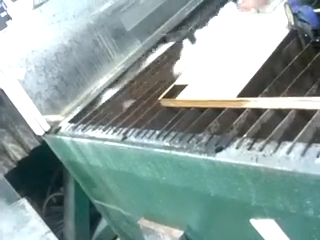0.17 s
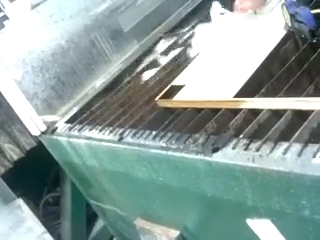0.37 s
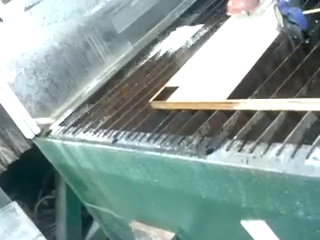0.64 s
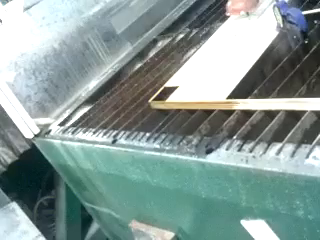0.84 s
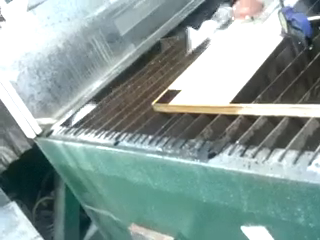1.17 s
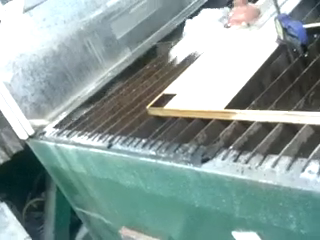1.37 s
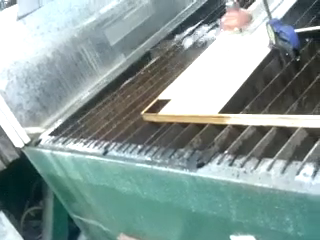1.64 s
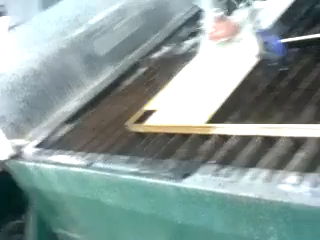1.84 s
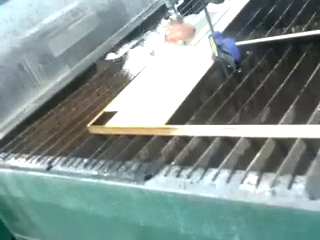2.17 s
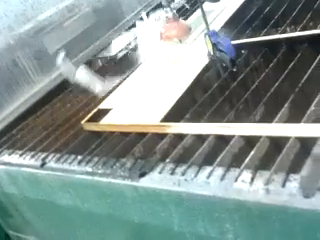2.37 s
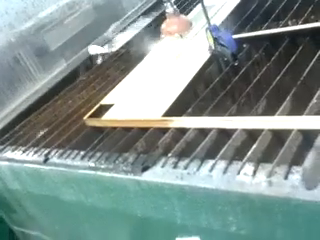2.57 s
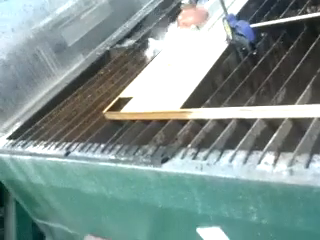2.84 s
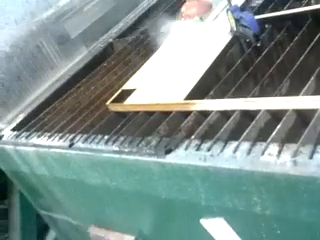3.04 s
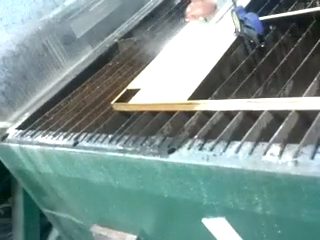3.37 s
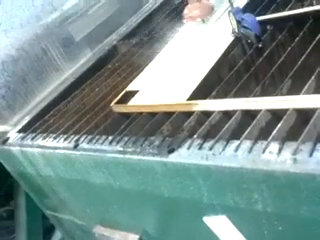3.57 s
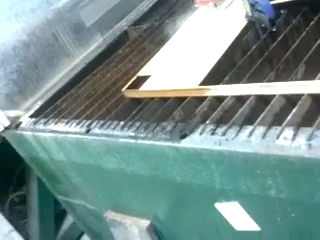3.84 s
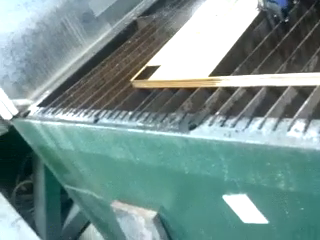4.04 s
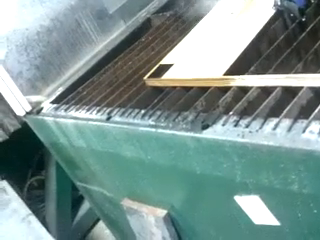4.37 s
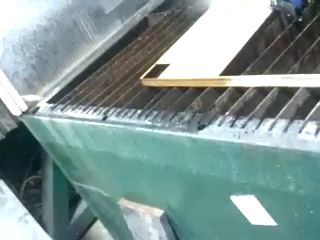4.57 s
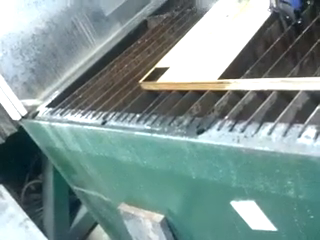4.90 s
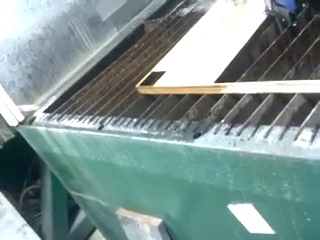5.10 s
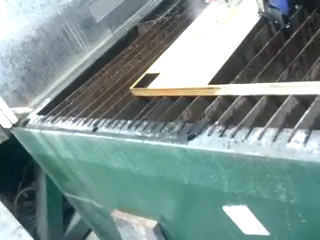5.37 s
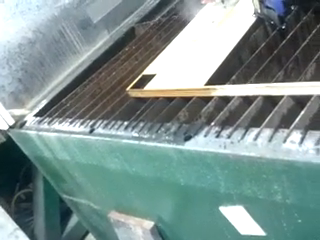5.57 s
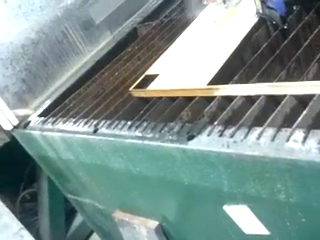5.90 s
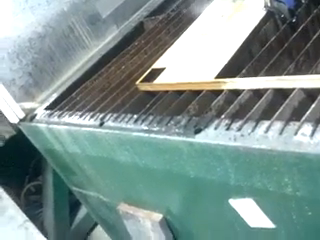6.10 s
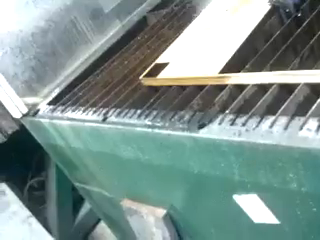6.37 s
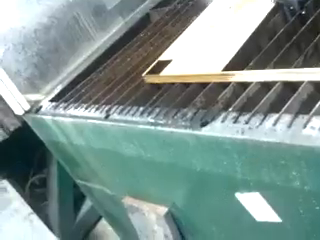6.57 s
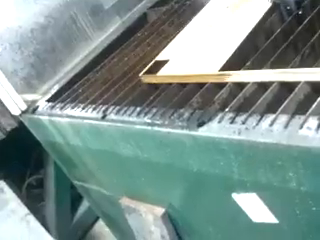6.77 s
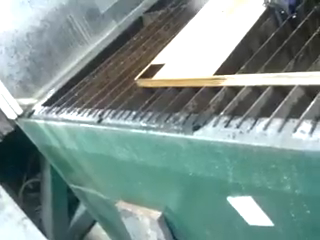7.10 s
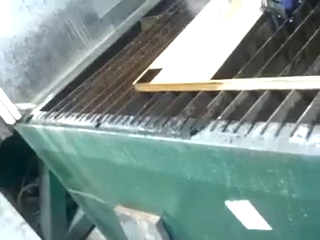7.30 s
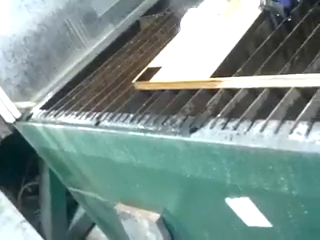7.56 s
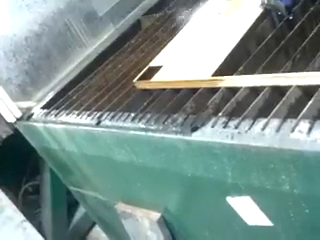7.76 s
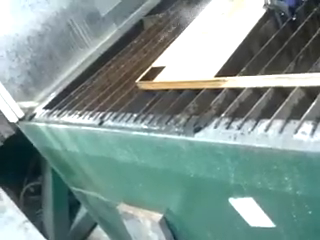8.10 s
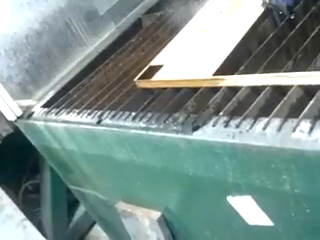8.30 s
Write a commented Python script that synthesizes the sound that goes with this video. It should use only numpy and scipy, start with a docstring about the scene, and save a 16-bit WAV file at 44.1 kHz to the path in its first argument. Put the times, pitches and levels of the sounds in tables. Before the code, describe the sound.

A waterjet cutter hisses and sprays steadily close by, water churning in its tank over a whining pump and low machine hum.

```python
"""In a workshop, a waterjet cuts a slab over a steel catch tank, close to a small stereo camera.
Behind it a pump, a second motor and a faint low drone hum as multiples of slightly unsteady rotations.
The tank booms, churns, splashes and patters: coloured patchy noise, with random drops in the last two.
The jet hisses and sprays as brighter noise with drops, and slot and nozzle ring as narrow bands of noise.
Once a sharp tick sounds at the left port and the level dips briefly."""
import sys
import numpy as np
from scipy import signal
from scipy.fft import rfft, irfft, next_fast_len
from scipy.io import wavfile
from scipy.ndimage import uniform_filter1d, map_coordinates

SR = 44100
rng = np.random.default_rng(int(sys.argv[2]) if len(sys.argv) > 2 else 0)


def unload_wav(signal):
    """Save mono or channel-first audio to the path in sys.argv[1] as 16-bit WAV at rate SR, clipped to [-1, 1]."""
    wavfile.write(
        sys.argv[1],
        SR,
        np.round(np.clip(np.atleast_2d(signal).T, -1, 1) * 32767).astype(np.int16),
    )


N = 372204
T = np.arange(N) / SR  # time of each sample [s]


def amp(db):
    """Turn decibels into a gain."""
    return 10 ** (np.asarray(db) / 20)


def unit(x):
    """Scale to an rms of 1."""
    return x / np.sqrt(np.mean(x ** 2) + 1e-20)


def along(points, hz):
    """Read (frequency [Hz], value) points along a logarithmic frequency axis."""
    point_hz, values = np.transpose(points)
    return np.interp(np.log(hz + 1), np.log(point_hz + 1), values)


def curve(rows):
    """Read (time [s], level [dB]) rows at every sample."""
    times, levels = np.transpose(rows)
    return np.interp(T, times, levels)


def swells(rows):
    """Bell-shaped swells from (time, length at half height, dB, ...) rows: one curve for each dB column."""
    times, lengths, *db_columns = np.transpose(rows)
    bells = 0.5 ** ((2 * (T - times[:, None]) / lengths[:, None]) ** 2)
    return np.array(db_columns) @ bells


def wobble(rate):
    """A smooth random curve through rate random knots a second."""
    knots = rng.standard_normal(int(N * rate / SR) + 4)
    return map_coordinates(knots, [T * rate])


def filtered(x, response):
    """Shape the spectrum of x by a response of frequency."""
    size = next_fast_len(N + SR // 2)
    spectrum = rfft(x, size) * response(np.fft.rfftfreq(size, 1 / SR))
    return irfft(spectrum, size)[..., :N]


def turbulence(patchy_db):
    """Turbulent water: two white noises whose strength drifts in shared patches of time and pitch."""
    cells = signal.stft(rng.standard_normal((2, N)), nperseg=512)[2]
    patches = uniform_filter1d(rng.standard_normal(cells.shape[1:]), size=6, axis=0)  # across pitch
    patches = uniform_filter1d(patches, size=16, axis=1)  # across time
    noise = signal.istft(cells * amp(patchy_db * unit(patches)), nperseg=512)[1]
    return unit(noise[:, :N])


def drops(rate):
    """Drops landing: tiny impacts of random size at random moments, about rate a second in each channel."""
    return unit((rng.random(N) < rate / SR) * rng.standard_normal((2, N)))


# How unlike the two microphone ports hear the water: (frequency [Hz], side over mid [dB])
PORT_WIDTH = [(50, -6), (110, 10), (170, 1), (270, -10.5), (450, -4), (750, -8.5), (1050, -26), (1700, 13),
              (2400, 1.5), (9500, 0)]


def at_ports(pair, spectrum):
    """Colour a mid and side pair and spread it over the left and right ports."""
    def response(hz):
        side_gain = amp(along(PORT_WIDTH, hz))
        return amp(along(spectrum, hz)) * np.array([np.ones_like(hz), side_gain])
    mid, side = filtered(pair, response)
    return np.array([mid + side, mid - side]) / np.std(mid)


def hum(hz, tones, drift, waver_db):
    """Multiples of one slightly unsteady rotation; each tone wavers on its own at each port."""
    turn = 2 * np.pi * hz * np.cumsum(1 + drift * wobble(5)) / SR
    ports = np.array([[.5], [-.5]])  # left, right
    out = np.zeros((2, N))
    for multiple, db, lean_db, lead in tones:
        waver = waver_db * np.array([wobble(2.84), wobble(2.89)])
        gain = amp(db + ports * lean_db + waver)
        out += gain * np.sin(round(multiple) * turn + ports * lead)
    return np.sqrt(2) * out  # a 0 dB tone has an rms of about 1


# The low drone as it stands in the room:
# (multiple of rotation, relative level [dB], left over right [dB], left lead [rad])
DRONE_TONES = [(1, 0, 3.7, 3.25)]
DRONE_HZ, DRONE_DB = 111.2, -50


def drone():
    """A faint low tone far beneath the machines."""
    return amp(DRONE_DB) * hum(DRONE_HZ, DRONE_TONES, drift=0.0011, waver_db=3.0)


# The second motor's tones as they stand in the room:
# (multiple of rotation, relative level [dB], left over right [dB], left lead [rad])
MOTOR_TONES = [(1, -3, -8.5, 0.21), (2, 0.16, -10, 1), (4, -15, -5, 0)]
MOTOR_HZ, MOTOR_DB = 387.68, -36.5


def motor():
    """A second motor at one overall setting; only its separate tones waver."""
    return amp(MOTOR_DB) * hum(MOTOR_HZ, MOTOR_TONES, drift=0.00066, waver_db=3.0)


# The pump's tones as they stand in the room:
# (multiple of rotation, relative level [dB], left over right [dB], left lead [rad])
PUMP_TONES = [(1, -15, -3, -.5), (2, 0.5, -3, .2), (3, -15, -7, -.6), (4, -20, -3, -.4), (6, -23, 0, 0),
              (7, -26, 0, 0), (9, -23.5, -1, -.7), (10, -19, -3, -1.7), (12, -26, 0, -3)]
# The pump's whine where the camera stands, before its random waver: (time [s], level [dB])
PUMP_LEVEL = [(0, -30), (1.8, -29.5), (2.4, -27.5), (3.6, -27.5), (4.1, -29.5), (5.7, -29), (6.1, -30.5),
              (7.1, -26.5), (8.44, -27.5)]
PUMP_HZ = 208.68
PUMP_SWING_DB, PUMP_SWINGS_PER_S = .7, 6


def pump():
    """The pump's rotation whines in many multiples, its level wavering a little at random."""
    level_db = curve(PUMP_LEVEL) + PUMP_SWING_DB * wobble(PUMP_SWINGS_PER_S)
    return amp(level_db) * hum(PUMP_HZ, PUMP_TONES, drift=0.0012, waver_db=.8)


# How hard the tank water is stirred: (time [s], churning level [dB])
TANK_STIR = [(0, -31.5), (1.5, -33.5), (2.15, -30.5), (3.3, -32.5), (4.1, -29), (5.0, -29.5), (5.9, -28),
             (6.5, -30.5), (7.15, -30), (7.8, -30.5), (8.44, -30)]
# Gulps where the jet throws up more water:
# (time [s], length at half height [s], extra churning [dB], extra splashing [dB])
GULPS = [(1.92, 0.087, 3, 4), (2.16, 0.054, 9, 1), (2.77, .09, 6, 3.5), (2.875, .045, 5, 7),
         (3.81, 0.078, 7.5, 1), (4.21, 0.043, 0.5, 2.5), (4.68, 0.064, 0, 7), (4.79, 0.041, 1, 6),
         (4.93, 0.13, 1.5, 4), (5.09, 0.061, 0, 5), (5.27, 0.041, 1.5, 1), (5.58, .06, 2.5, 6.5),
         (5.83, 0.086, 3, 3), (6.97, 0.041, 2.5, -1), (7.21, 0.046, 5, 2), (8.22, .04, 6, 0)]
# Deep heaves of the tank water: (time [s], length at half height [s], extra boom [dB])
HEAVES = [(1.5, 0.041, 6), (2.75, .05, 6), (2.85, 0.07, 14.5), (3.43, 0.078, 11.5), (4.68, .07, 7.5),
          (4.87, .06, 6.5), (5.0, 0.11, 8), (7.68, 0.087, 5)]
# Spectral shapes of the tank's boom, churning, splashing and fine patter:
# (frequency [Hz], relative level per Hz [dB])
BOOM_SPECTRUM = [(25, -56), (55, -28), (90, -20.5), (135, -9), (175, 2), (200, 2), (260, -15), (700, -88)]
CHURN_SPECTRUM = [(50, -88), (150, -25), (200, -7.5), (235, -2), (275, 3.5), (360, 0), (405, 4.5),
                  (470, -6.5), (700, -36), (2000, -90)]
SPLASH_SPECTRUM = [(60, -90), (330, -8), (460, 0), (550, -1.5), (640, -.5), (800, -2), (950, -5),
                   (1100, -4), (1300, -5.5), (1500, -11), (1900, -22), (4000, -90)]
PATTER_SPECTRUM = [(600, -60), (1400, -5), (1600, -1.5), (1850, -1), (2050, -1.5), (2200, -5), (2400, -14),
                   (3000, -35), (6000, -90)]
SLOSH_PER_S, SLOSH_DB = 15, 1.07  # the water sloshes at random
# the deep boom eases off as the cut advances
BOOM_DB, BOOM_FADE_DB_PER_S, BOOM_SWING_DB = -41, 0.5, 2.5
SPLASH_DB, SPLASH_FOLLOWS = -29.5, 0.4  # follows the churning in part
PATTER_DB, PATTER_FOLLOWS = -40.5, 0.45  # follows the splashing in part


def tank():
    """The spent jet churns the tank, makes it boom, splashes and patters on the slats."""
    stir_db = curve(TANK_STIR)
    gulp_churn_db, gulp_splash_db = swells(GULPS)
    heave_db, = swells(HEAVES)
    slosh_db = SLOSH_DB * wobble(SLOSH_PER_S)
    surge_db = wobble(32)  # shared by all four layers, in different amounts

    boom_db = BOOM_DB - BOOM_FADE_DB_PER_S * T + heave_db + BOOM_SWING_DB * wobble(SLOSH_PER_S)
    boom = amp(boom_db + surge_db) * at_ports(turbulence(patchy_db=0.9), BOOM_SPECTRUM)

    churn_db = stir_db + slosh_db + gulp_churn_db
    churn = amp(churn_db + 0.29 * surge_db) * at_ports(turbulence(patchy_db=1.24), CHURN_SPECTRUM)

    stirring_db = stir_db - stir_db.mean() + slosh_db
    splash_db = SPLASH_DB + SPLASH_FOLLOWS * stirring_db + gulp_splash_db
    splash_water = turbulence(patchy_db=1.8) + amp(-10.0) * drops(rate=610)
    splash = amp(splash_db + 0.61 * surge_db) * at_ports(splash_water, SPLASH_SPECTRUM)

    patter_db = PATTER_DB + PATTER_FOLLOWS * (splash_db - SPLASH_DB)
    patter_water = turbulence(patchy_db=2.0) + amp(-8.5) * drops(rate=900)
    patter = amp(patter_db + .5 * surge_db) * at_ports(patter_water, PATTER_SPECTRUM)
    return boom + churn + splash + patter


def ring(hz, width_hz):
    """Stereo noise in one narrow resonance whose pitch wanders."""
    pole = np.exp(-np.pi * 1.56 * width_hz / SR)  # 1.56 makes up for two poles being narrower than one
    noise = rng.standard_normal((2, 2, N))
    in_phase, quadrature = signal.lfilter([1], [1, -2 * pole, pole ** 2], noise)
    turn = 2 * np.pi * hz * np.cumsum(1 + .006 * wobble(5)) / SR  # pitch drift as a share
    mid, side = unit(in_phase * np.cos(turn) + quadrature * np.sin(turn))
    return np.array([mid + side, mid - side])


def reflected(x, db, count):
    """Slab, slats and splash guard send each port its own weak copies within 14 ms, rippling the spectrum."""
    delays = rng.uniform(.003, .014, (2, count))  # [s]
    echoes = np.zeros_like(x)
    for port in range(2):
        for delay in delays[port]:
            echoes[port] += np.roll(x[port], round(delay * SR))
    return (x + amp(db) * echoes) / np.sqrt(1 + count * amp(db) ** 2)


# How hard the jet bites into the slab: (time [s], level [dB])
BITE = [(0.0, -31.5), (0.2, -32.5), (0.45, -37.2), (0.8, -33.5), (1.55, -34), (1.83, -31.5), (2.15, -34),
        (2.72, -35.8), (2.86, -33.5), (3.25, -37), (3.5, -33), (4.1, -32), (4.6, -34.5), (5.05, -34),
        (5.18, -38), (5.42, -30.9), (5.6, -36.5), (6.0, -37), (6.29, -32), (6.34, -36.9), (7.4, -36),
        (8.44, -35.5)]
# Moments when the cut flares up: (time [s], length at half height [s], extra level [dB])
FLARES = [(4.7, 0.03, 6.5), (4.96, 0.08, 6.5)]
# How much spray the jet throws as it moves through the slab: (time [s], level [dB])
SPRAY_LEVEL = [(0.0, -30), (0.08, -28.5), (0.3, -33), (0.5, -36), (0.8, -30), (1.1, -32.5), (1.25, -30.1),
               (1.85, -31.1), (2.12, -38), (2.3, -34.5), (2.75, -37), (3.1, -34.5), (3.25, -36.4),
               (3.4, -33.5), (3.8, -31.5), (4.3, -33.5), (5.0, -35), (5.18, -36.5), (5.42, -32.5),
               (5.6, -35), (6.8, -34.5), (7.4, -34.5), (7.75, -34), (8.44, -35)]
# Spectral shapes of the hiss in the cut and of the spray: (frequency [Hz], relative level per Hz [dB])
CUT_SPECTRUM = [(1200, -60), (2000, -16), (2400, -10), (2750, -14), (3400, -12), (4400, -10), (5400, -12.5),
                (6200, -11.5), (9000, -60)]
SPRAY_SPECTRUM = [(3500.0, -57), (5300.0, -13), (6000.0, -12), (7000.0, -8.5), (8000.0, -8.1), (8800.0, -9),
                  (10300.0, -6), (11000.0, -9), (11600.0, -60.0)]
# Resonances of slot and nozzle, changing as the cut advances:
# (frequency [Hz], width [Hz], level halfway [dB], level slope [dB per s])
RINGS = [(3090, 420, -44.5, -0.4), (3477, 370, -44, -1.54), (3833, 235, -42, 0.42),
         (4965, 510.0, -41.5, -1.06), (6130, 240, -39.5, -0.1), (6470.0, 430, -39, 0.6),
         (7340, 190.0, -47.5, -0.5), (7640.0, 300, -46.5, 1.8), (9430, 290, -45, 0.4),
         (9920, 470.0, -44, 1.55)]
RING_SPLIT_HZ, RING_FOLLOWS = 5500, 0.75  # lower rings follow the bite in part, higher ones the spray
RING_SWING_DB = 1.5


def jet():
    """The jet hisses in the cut, scatters spray and makes slot and nozzle ring; all sputter together."""
    bite_db = curve(BITE) + swells(FLARES)[0]
    spray_db = curve(SPRAY_LEVEL)

    cut_water = turbulence(patchy_db=2.0) + amp(-10) * drops(rate=2500)
    cut = amp(bite_db) * at_ports(cut_water, CUT_SPECTRUM)
    spray_water = turbulence(patchy_db=1.8) + amp(-10) * drops(rate=4000)
    spray = amp(spray_db) * at_ports(spray_water, SPRAY_SPECTRUM)

    hiss = cut + spray
    for hz, width_hz, db, db_per_s in RINGS:
        drive_db = bite_db if hz < RING_SPLIT_HZ else spray_db
        level_db = db + db_per_s * (T - T.mean()) + RING_FOLLOWS * (drive_db - drive_db.mean())
        hiss += amp(level_db + RING_SWING_DB * wobble(5)) * ring(hz, width_hz)
    sputter_db = .5 * wobble(34)
    return amp(sputter_db) * reflected(hiss, db=-22, count=8)


# How the water leans to one port or the other: (frequency [Hz], left over right [dB])
WATER_LEAN = [(60, 1.5), (130, 5), (300, -1), (670, -3), (1100, 0), (1900, -3), (2700, 0), (3400, -2),
              (4200, 0), (4900, 2.5), (5500, 0), (6100, -3), (6800, -1), (10000, -.5)]


def water():
    """Tank and jet together, each pitch leaning to one port or the other."""
    return filtered(tank() + jet(), lambda hz: amp(np.outer([.5, -.5], along(WATER_LEAN, hz))))


TICK_S = 6.304


def tick():
    """One sharp spike at the left port, perhaps from a droplet striking it."""
    u = (T - TICK_S) / .00005  # time in units of 50 microseconds
    spike = (1 - u ** 2) * np.exp(-u ** 2 / 2)
    return spike * np.array([[1.25], [0]])


# The brief dip after the tick: (time after the tick [s], level [dB])
DIP = [(0, 0), (.002, -7), (.007, -16), (.0185, -17), (.0195, -2), (.12, 0)]


def scene():
    """Machines behind, water close by; both dip for a moment after the tick."""
    dip_db = np.interp(T - TICK_S, *np.transpose(DIP))
    return (drone() + motor() + pump() + water()) * amp(dip_db) + tick()


# The stereo widener's notches, in the mid and in the side by turns:
# (notch [Hz], frequency above it where mid and side are even [Hz])
NOTCHES = [(0, 700), (1400, 2200), (2800, 3360), (4220, 5030), (5540, 6000), (6820, 7580), (8220, 8930),
           (9690, 10400), (11020, 11700)]
# How steep the notch walls are: (frequency [Hz], exponent)
NOTCH_STEEPNESS = [(1400, 1.5), (2800, 2.3), (4000, 1.6), (5500, 1.9), (8200, 1.35), (10000, 1.4)]
LOW_CUT_HZ, TOP_HZ = 45, 11020


def record(dry):
    """The camera widens its stereo: above the bass, interleaved combs deal the pitches out to mid and side."""
    def widen(hz):
        feed = .99 * np.clip((hz - 700) / 500, 0, 1)  # no widening below 700 Hz
        quarter_turns = np.interp(hz, np.ravel(NOTCHES), np.arange(np.size(NOTCHES)))
        echo = feed * np.exp(-1j * np.pi / 2 * quarter_turns)
        combs = np.abs([1 - echo, 1 + echo]) ** along(NOTCH_STEEPNESS, hz)
        level = np.sqrt(2 + 2 * feed ** 2) / (1 + feed)
        return combs / np.linalg.norm(combs, axis=0) * level

    def microphone(hz):
        # the small microphone loses the deep bass; nothing passes from TOP_HZ up
        return hz ** 2 / (hz ** 2 + LOW_CUT_HZ ** 2) * (hz < TOP_HZ)

    mid_side = np.array([dry[0] + dry[1], dry[0] - dry[1]]) / 2
    mid, side = filtered(mid_side, widen)
    return filtered(np.array([mid + side, mid - side]), microphone)


dry = scene()
out = record(dry)
unload_wav(out)
```